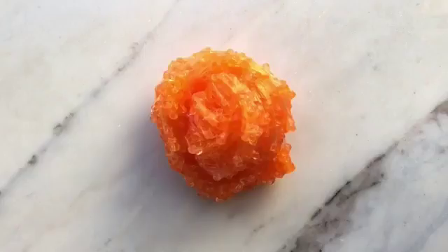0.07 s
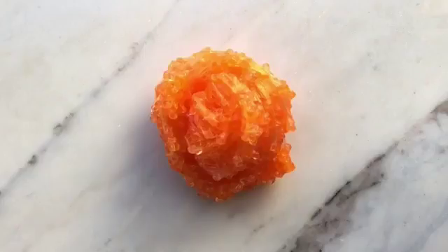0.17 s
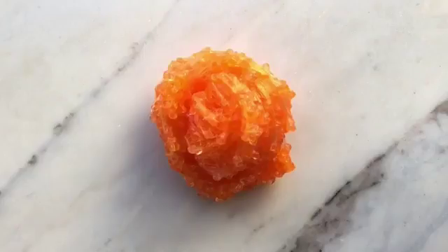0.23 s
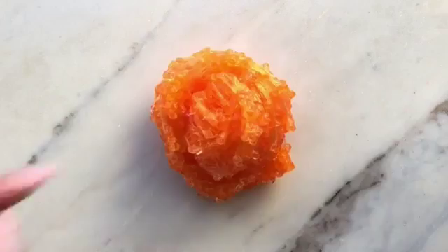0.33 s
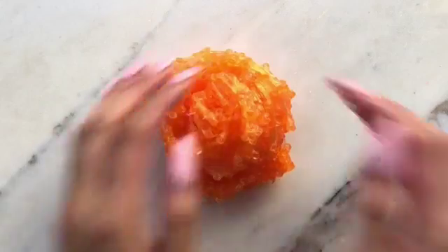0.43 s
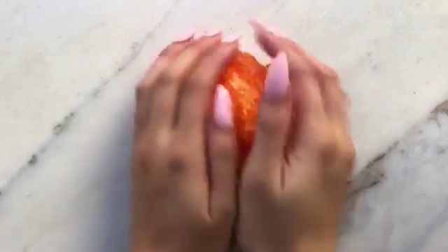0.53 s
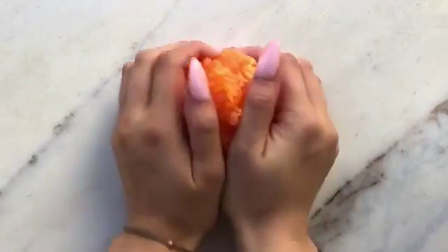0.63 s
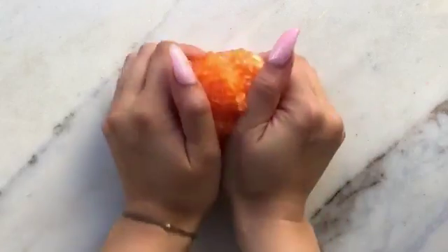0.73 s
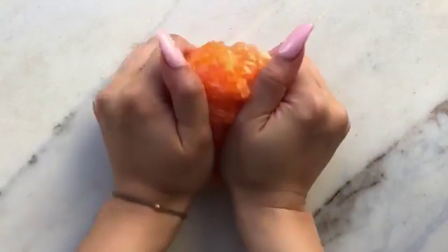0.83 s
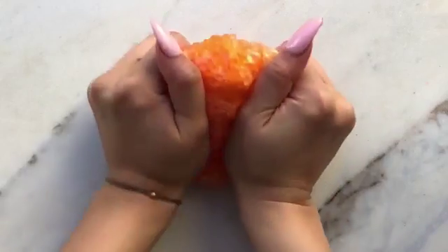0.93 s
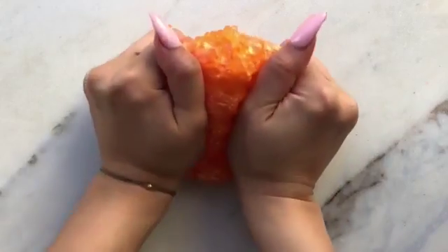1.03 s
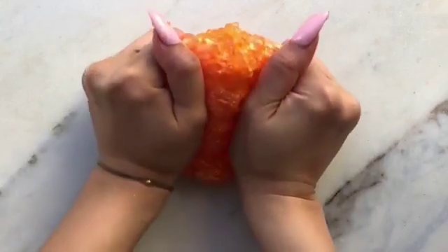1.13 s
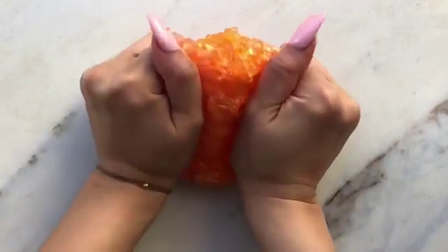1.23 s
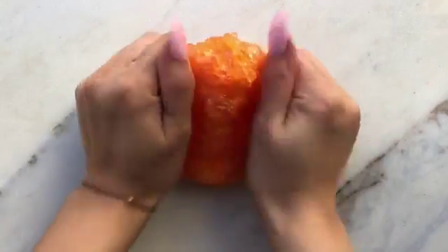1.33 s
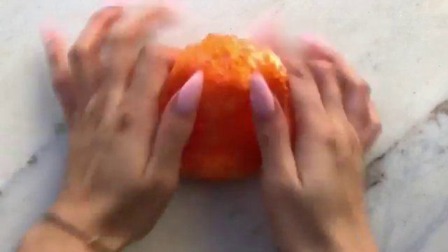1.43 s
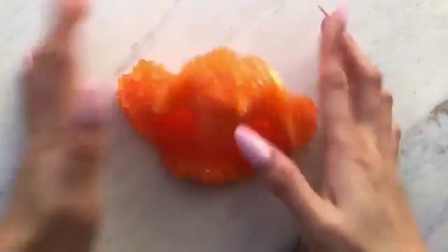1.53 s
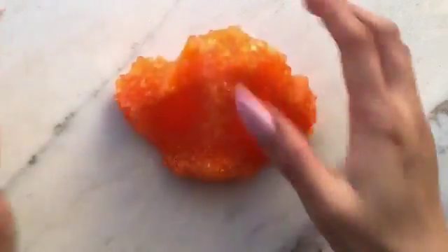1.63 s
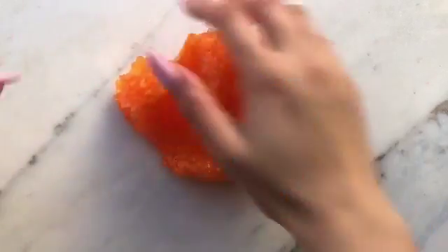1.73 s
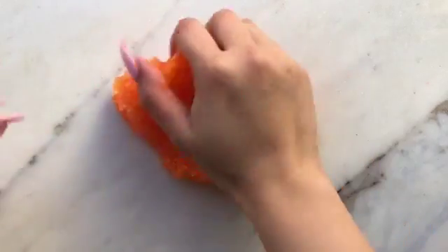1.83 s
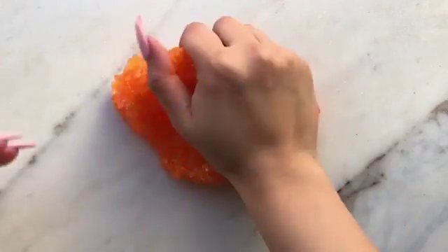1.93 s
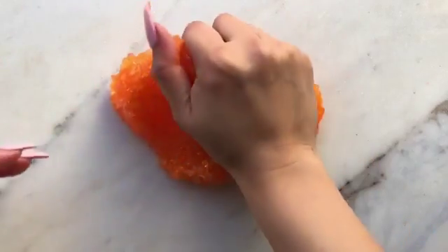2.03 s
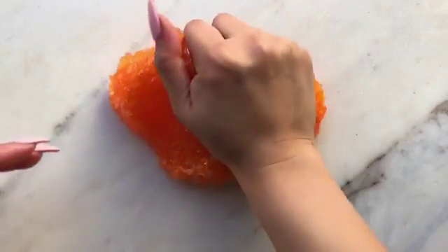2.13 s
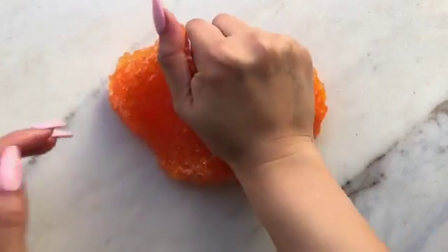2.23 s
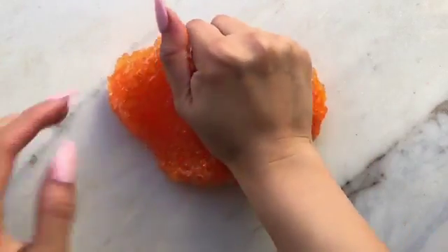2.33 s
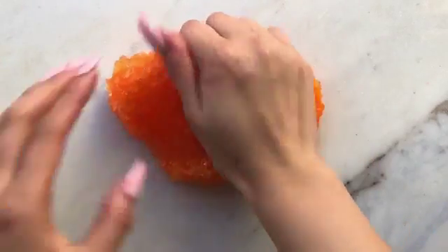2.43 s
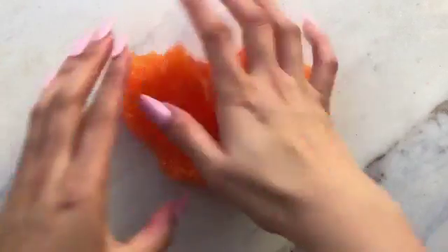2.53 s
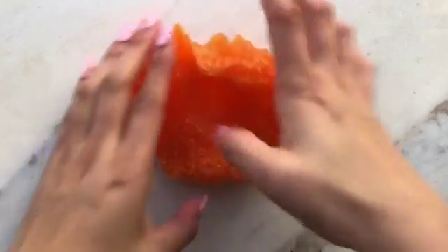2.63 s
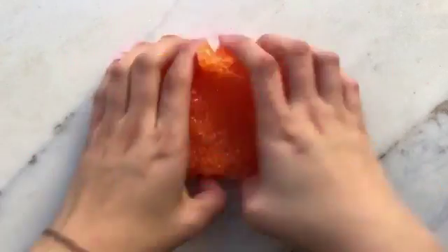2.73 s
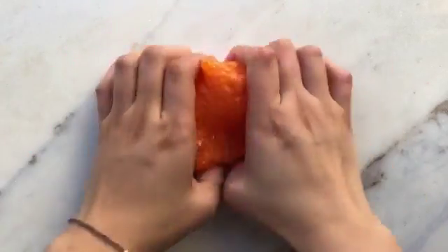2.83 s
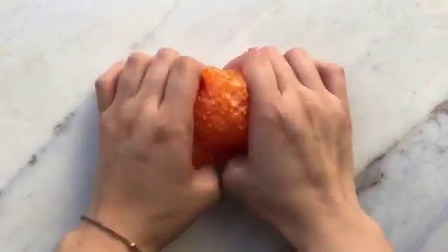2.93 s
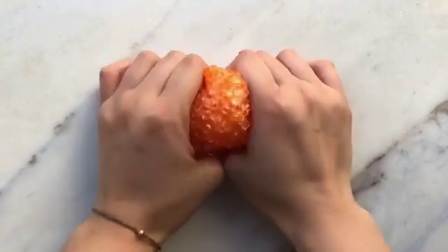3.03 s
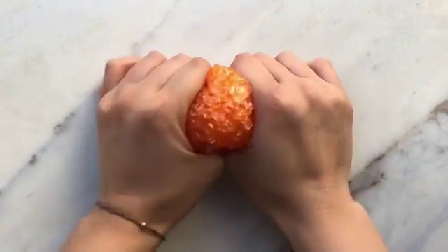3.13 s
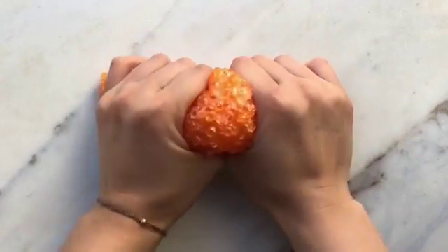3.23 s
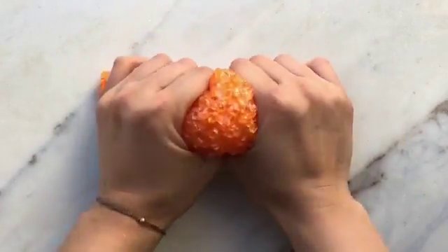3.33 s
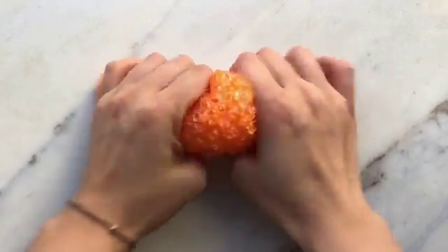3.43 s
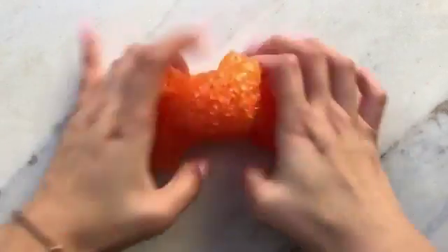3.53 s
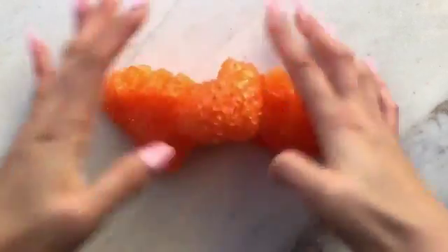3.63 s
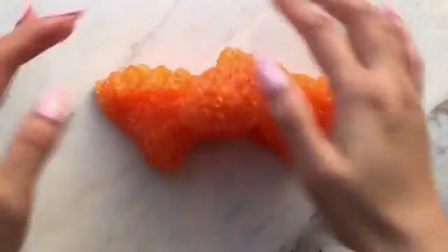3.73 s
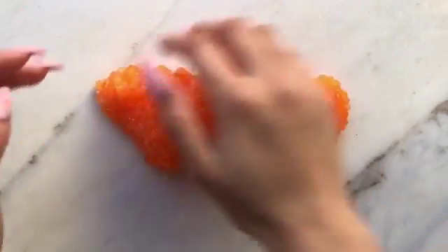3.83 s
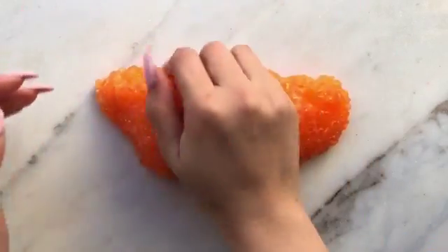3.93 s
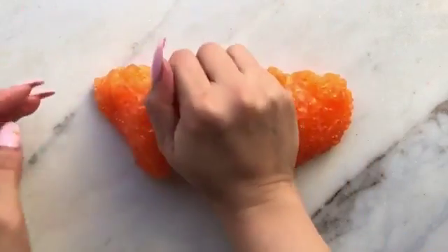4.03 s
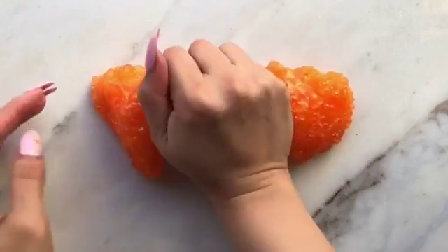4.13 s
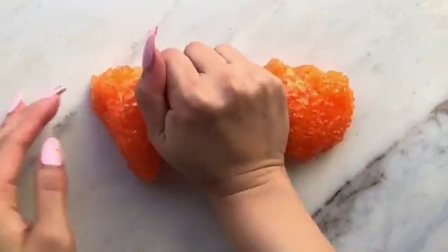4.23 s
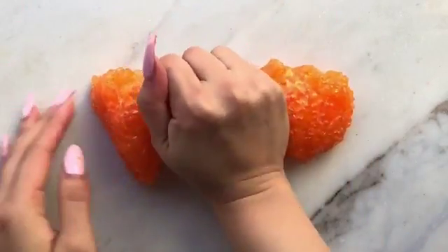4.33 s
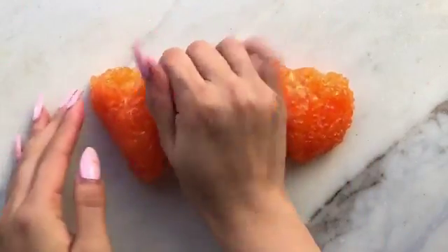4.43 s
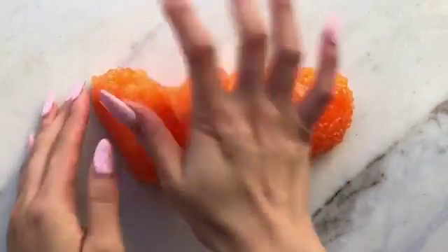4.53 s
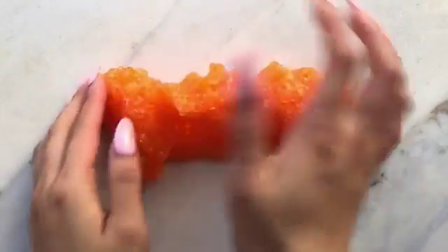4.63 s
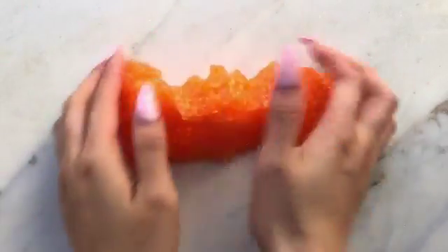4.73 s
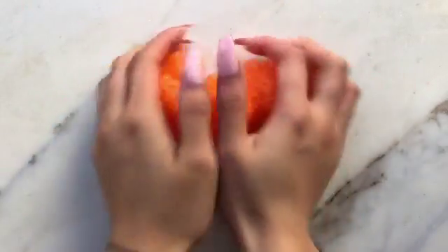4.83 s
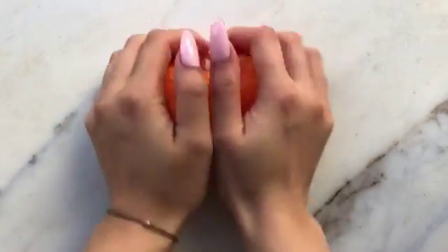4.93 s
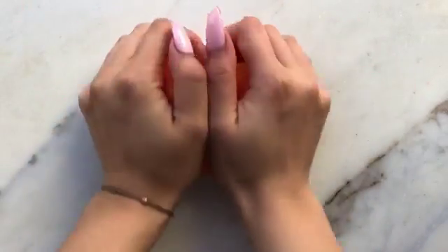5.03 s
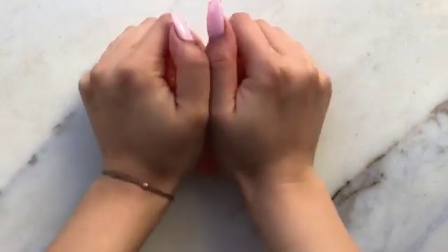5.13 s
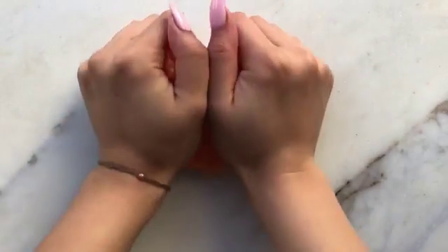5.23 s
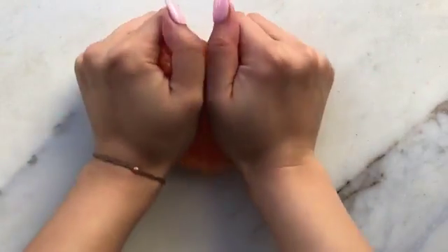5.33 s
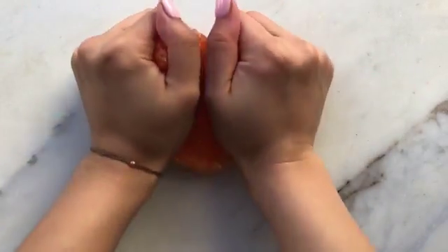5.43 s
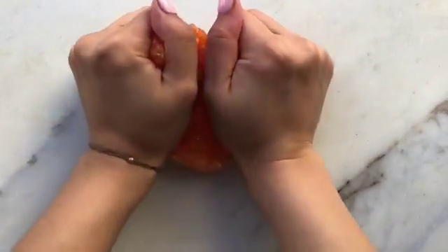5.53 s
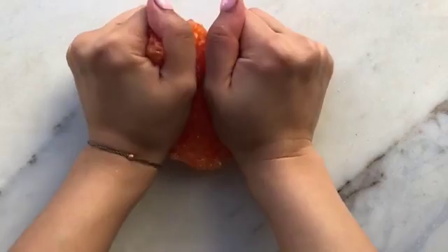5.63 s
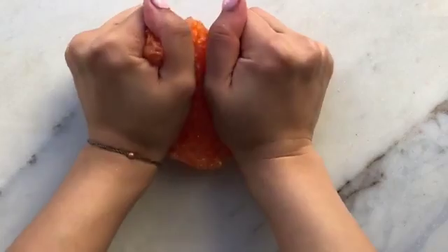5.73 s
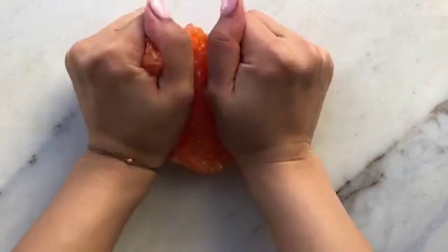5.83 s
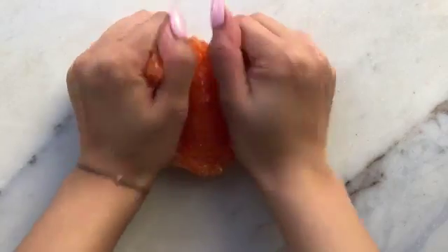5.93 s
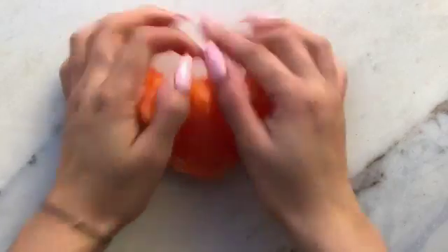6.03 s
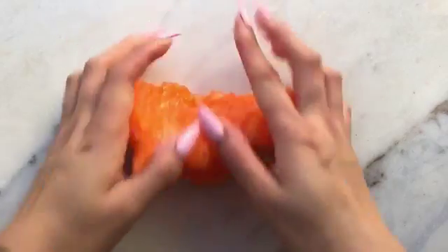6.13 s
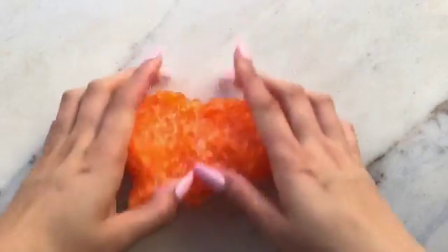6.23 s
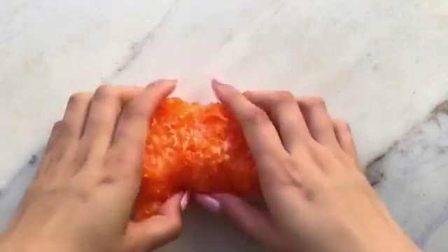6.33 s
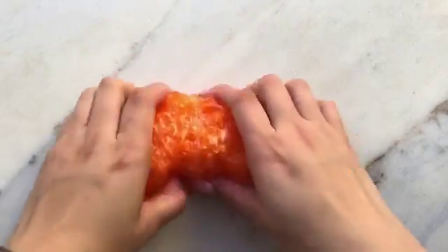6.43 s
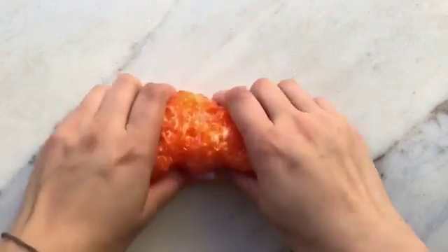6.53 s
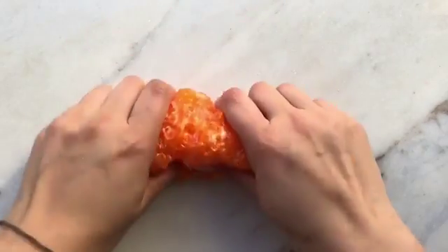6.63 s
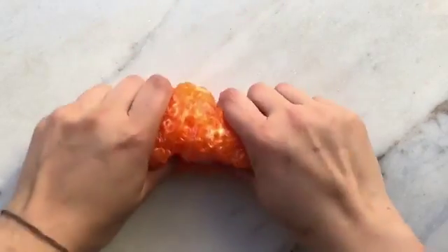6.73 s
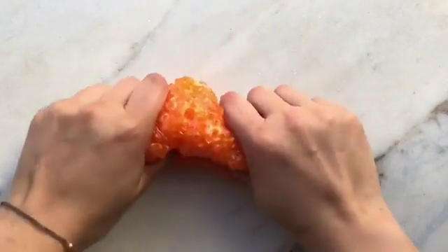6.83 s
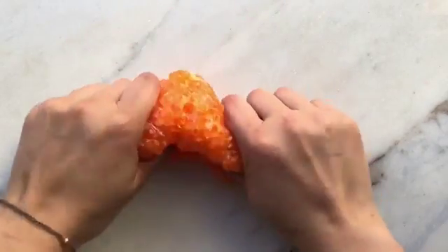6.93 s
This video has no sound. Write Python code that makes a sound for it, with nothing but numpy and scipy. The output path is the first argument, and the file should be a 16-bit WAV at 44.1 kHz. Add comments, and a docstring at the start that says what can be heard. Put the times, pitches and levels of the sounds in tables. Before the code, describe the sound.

Hands work slime full of small beads on a stone table, heard close up with very little echo. It opens with one pop as the slime peels free. From about 0.6 to 1.4 seconds the first squeeze brings sharp pops of bursting air over a dense, bright crackle and a wet squelch. More squeezes follow at about 1.8 to 2.4, 2.8 to 3.4, 4 to 4.5 and 4.8 to 5.9 seconds, and a last one from 6.3 to around 7 seconds. The first two are the strongest. Between the squeezes come sticky peels, with softer crackle and a few scattered pops. At 5.5 seconds a soft, low bump sounds far off in the building, under the fifth squeeze. A quiet room rumble and a faint motor hum run throughout, and the rumble swells briefly near 6.8 seconds.

```python
"""Hands work a slime full of small beads on a stone table, close up, over room rumble and faint motor hum.
It opens on one pop as the slime peels free. From 0.6 s come six squeezes with a sticky peel between each:
air pockets between the beads burst as sharp pops over a dense crackle and a wet squelch, and the table
throws each pop back at once. At 5.5 s, under the fifth squeeze, a distant bump sounds in the building.
The rumble swells under the last squeeze."""
import sys
import numpy as np
from scipy import signal
from scipy.fft import rfft, irfft
from scipy.io import wavfile
from scipy.ndimage import uniform_filter1d

SR = 44100
rng = np.random.default_rng(int(sys.argv[2]) if len(sys.argv) > 2 else 0)


def generate_wav(sig):
    """Save sig (samples, or channels by samples) to the path in sys.argv[1] as 16-bit PCM at SR."""
    pcm = np.round(np.clip(np.atleast_2d(sig).T, -1, 1) * 32767).astype(np.int16)
    wavfile.write(sys.argv[1], SR, pcm)


N = 307366

# tone colour of the room's air: (frequency [Hz], relative level [dB])
ROOM_SPECTRUM = [(20, -65), (45, -8), (60, 2.5), (72, -10.5), (86, 3.5), (96, -8.5), (106, 0.5),
                 (116, -10.5), (128, 2.5), (150, -5.5), (220, -10.5), (350, -20), (500, -19), (800, -27),
                 (2000, -34.5), (8000, -41.5), (14000, -48.5)]
# level ride of the rumble: (time [s], level [dB])
RUMBLE_RIDE = [(0.0, -55.5), (1.5, -52), (2.4, -58.5), (2.6, -54), (4.5, -52), (4.85, -49), (5.2, -53),
               (6.55, -53.5), (6.77, -44), (6.97, -53)]
# motor tones: (frequency [Hz], rms level [dB])
MOTOR_TONES = [(328, -76), (652, -73.5), (1717, -84)]
# low modes of the bump in the building: (frequency [Hz], level [dB], time to fall 60 dB [s])
BUMP_MODES = [(57.4, -39, 0.59), (91.3, -36.5, 0.71), (112, -34.5, 0.63), (137.3, -40, 0.66),
              (170, -42.5, 0.44), (226, -36, 0.233), (297, -41.5, .15)]
# slaps off the table, hands and phone stand: (average delay [ms], highest level [dB])
CLOSE_ECHOES = [(.42, -5), (1.2, -12), (2.3, -14), (3.4, -10)]
# tone colour of the crackle: (frequency [Hz], relative level [dB])
CRACKLE_SPECTRUM = [(900, 12), (1800, 2), (3000, 9), (5500, 8.5), (8000, 7), (11500, 3), (13700, 0.5)]
# hands close on the slime; the five times, once sorted, mark touch, grip, press, ease and still:
# (five times [s], base crackle level at grip [dB], at press [dB], at ease [dB])
SQUEEZE_CUES = [(0.58, 0.71, 0.96, 1.186, 1.395, -32, -30.5, -36.5),
                (1.84, 1.93, 1.89, 2.29, 2.454, -48.5, -33, -40),
                (2.78, 2.84, 3.29, 3.355, 3.375, -41, -34.5, -41.5),
                (3.95, 4.07, 4.21, 4.33, 4.51, -42.5, -38, -46.5),
                (4.76, 4.86, 5.5, 5.86, 5.91, -44.5, -38.5, -47),
                (6.25, 6.4, 6.54, 6.92, 7.1, -46.5, -36, -41)]
# skin peels off the sticky surface: same columns
PEEL_CUES = [(-0.1, 0.0, 0.054, 0.067, 0.087, -48.5, -41.5, -49),
             (1.3, 1.4, 1.597, 1.57, 1.616, -34.5, -39.5, -53),
             (2.38, 2.48, 2.565, 2.655, 2.625, -44, -33.5, -43.5),
             (3.42, 3.53, 3.654, 3.56, 3.825, -38, -34.5, -39),
             (4.42, 4.5, 4.56, 4.621, 4.68, -38.5, -35, -45), (5.93, 6.01, 6.1, 6.256, 6.37, -36, -34, -44)]
# air pockets that burst alone: (time [s], peak level [dB], pitch [Hz], knock gain within the pop [dB])
POP_CUES = [(0.047, -20.5, 9000, -28), (0.5606, -40.5, 3450.0, -22.0), (0.5917, -37, 6550, -23),
            (0.6223, -27, 4130.0, -27), (0.633, -22.0, 7900, -41), (0.6725, -21, 3100.0, -15),
            (0.6852, -18.0, 3060.0, -6), (0.6985, -16.5, 3400, -18), (0.71, -14, 3900, -18),
            (0.721, -13.5, 3270, -16), (0.7787, -22, 3380.0, -15), (0.8054, -15, 3010.0, -23.0),
            (0.8152, -13, 8100, -25.0), (0.8369, -9.5, 8450, -10), (0.8585, -7.5, 5430, -13),
            (0.8745, -14, 4780.0, -31), (0.8996, -7.5, 5030, -16), (0.9115, -2, 5850, -25),
            (0.9338, -8, 7040, -22), (0.9484, -10.5, 5190.0, -25), (0.9629, -1.5, 5960.0, -24),
            (0.9796, -7, 7640.0, -26.0), (0.9868, -4, 9050, -29), (1.0034, -2.5, 8450, -26),
            (1.028, -4, 9900, -44), (1.0383, -6.5, 8750, -39), (1.0434, -15, 8400, -40.0),
            (1.0584, 3, 6650, -21.5), (1.085, -3.5, 11000, -44), (1.1014, -11.0, 13330.0, -32.0),
            (1.1105, -8.5, 10400.0, -39), (1.1238, -0.5, 10030, -28.5), (1.1528, -0.5, 4950, -28),
            (1.1755, -20, 9950.0, -28.0), (1.2098, -5, 12300.0, -28), (1.2236, -9.5, 5710.0, -32),
            (1.2594, -5.5, 9350, -45), (1.3182, -16.5, 8500, -36), (1.3467, -14.5, 9200, -41),
            (1.375, -20, 11100, -34.0), (1.5233, -12.5, 13100, -30), (1.563, -19, 5230, -24.0),
            (1.597, -21, 5600.0, -35.5), (1.858, -21, 7100, -19), (1.8625, -25, 3080.0, -19),
            (1.9001, -13.5, 7620.0, -22.5), (1.9159, -17.5, 4000, -9), (1.9245, -19, 6300, -29.0),
            (1.9343, -14, 6300, -30.0), (1.9476, -11.5, 3900, -14), (2.0006, -5.5, 3860, -18.5),
            (2.0088, -10.5, 8800, -32.0), (2.0364, -6.5, 3100, -11.5), (2.062, -2.5, 3900, -12.5),
            (2.0668, -3, 12500, -24), (2.0747, -1, 7950, -37.0), (2.0856, 4.5, 8300, -29),
            (2.103, -0.5, 7560.0, -34), (2.1212, -8, 10790.0, -37), (2.1394, -2.5, 8450, -29),
            (2.1598, -5, 8300, -28.5), (2.1941, -4, 7730, -34), (2.22, -13.5, 8910.0, -40),
            (2.248, -9, 8050, -38), (2.2862, -2, 7500, -27), (2.3251, -8, 10300, -38),
            (2.3506, -12.5, 7410.0, -46.0), (2.3768, -16, 4100, -14), (2.4258, -32, 11400, -31),
            (2.6789, -30.5, 4170, -26.5), (2.8225, -17, 5810.0, -26), (2.846, -11, 5400, -24),
            (2.895, -27, 1960, -27), (2.9007, -15, 8050, -35), (2.955, -17.0, 8300, -22.0),
            (2.9633, -14.5, 3730.0, -30), (2.9736, -8.5, 6210, -31.0), (2.9895, -8, 8600, -30),
            (2.9951, -13.5, 2940, -21), (3.001, -9.5, 3300, -20), (3.059, -11.5, 3340.0, -11.5),
            (3.0622, -2, 7000, -17.5), (3.0861, -4, 5200, -34), (3.1403, -7, 6400, -37),
            (3.1488, -11, 3980, -30), (3.1572, -5, 8070, -30.0), (3.1697, -10.0, 5570, -16.5),
            (3.2244, -2.5, 11440, -34.0), (3.237, -11, 5860.0, -22), (3.2426, -20, 3500, -25),
            (3.2613, -9, 8270.0, -29), (3.2763, -18, 5340, -22), (3.2959, -13, 5530, -15.5),
            (3.3388, -10, 11820.0, -31), (3.3501, -14, 8660.0, -37), (3.3729, -14.5, 7560.0, -21),
            (3.3817, -18.5, 10800, -37), (3.4066, -18.5, 12600, -36), (3.635, -16, 6350.0, -16),
            (3.65, -14.5, 3250, -11), (3.6768, -13, 9000, -23), (3.7364, -20.5, 8200, -36),
            (3.9875, -20.5, 5490.0, -29.5), (4.0642, -19, 5000.0, -16), (4.073, -15, 5000, -24.0),
            (4.0907, -12.0, 3030, -20), (4.1172, -14, 2480, -20), (4.1531, -13.5, 4750, -22.5),
            (4.177, -19.5, 3420.0, -22), (4.1916, -7, 5680.0, -33.0), (4.2193, -15, 11110.0, -27.0),
            (4.2326, -7, 6700, -26), (4.2538, -17, 9820.0, -29.0), (4.2609, -0.5, 8700, -28),
            (4.2824, -14, 8340, -33), (4.2872, -2.5, 6600, -24.5), (4.3935, -34, 11800.0, -28.0),
            (4.4058, -21.5, 7600, -32), (4.744, -27.5, 6800, -24), (4.7931, -37, 6740.0, -19),
            (4.8209, -19.5, 5800, -26), (4.8551, -15.5, 3140, -24.0), (4.891, -18, 9400, -36),
            (5.0279, -18, 2860, -25), (5.0317, -12, 2920, -37), (5.1023, -17.5, 11670.0, -20),
            (5.1371, -16.5, 6960.0, -38), (5.1545, -23, 2930.0, -35), (5.1783, -22, 2760.0, -24),
            (5.2156, -17, 2820, -27.0), (5.2536, -15.5, 3300, -31), (5.277, -11, 5370, -42),
            (5.2966, -21, 3340.0, -28), (5.3071, -20, 3470.0, -26), (5.3223, -16.5, 3550.0, -17),
            (5.364, -12, 9370.0, -42), (5.3998, -10.5, 5150, -21.5), (5.409, -18, 3250, -26),
            (5.4212, -8, 5260, -13), (5.435, 0.5, 7300, -34), (5.4724, -14, 3210.0, -19),
            (5.4777, -11, 5570, -26), (5.4913, -3, 6840, -27), (5.548, -11.5, 3300, -27),
            (5.5598, -8.5, 13600, -30), (5.608, -16.5, 3630, -13.5), (5.633, -21, 8300, -24),
            (5.6664, -13.5, 8800, -35), (5.6813, -23, 7800, -24), (5.7081, -21, 12250.0, -28),
            (5.7446, -3.5, 8730, -49), (5.7788, -12, 4970, -34), (5.7892, -12.5, 7600, -23),
            (5.813, -8.5, 9970.0, -23), (5.819, -11.5, 4100, -12.5), (5.911, -24.5, 3470.0, -18),
            (5.9263, -19.5, 6300, -19), (6.201, -15.5, 7800, -23), (6.3315, -18, 4610.0, -40),
            (6.4035, -10.5, 4700, -12.5), (6.468, -25, 9130.0, -27), (6.5088, -23, 8570.0, -13),
            (6.531, -14, 4530, -6), (6.5426, -18, 6030, -20), (6.5778, -21, 6670, -24),
            (6.6085, -6.0, 6900, -23), (6.7148, -14.0, 7100, -19), (6.7255, -11.5, 6980, -13.5),
            (6.7456, -13, 7320.0, -19), (6.7643, -15, 4330.0, -21), (6.8032, -16, 11300, -20),
            (6.831, -8, 9440, -16), (6.8406, -19, 2100, -23), (6.873, -15, 7900, -30),
            (6.8864, -22, 4310.0, -13), (6.934, -15.5, 2350, -11), (6.95, -21.5, 2420, -9)]

# ends_db: crackle at touch and still; per stage, wet_db: squelch over crackle, tilt: brightness [dB/octave]
SQUEEZE_FEEL = dict(ends_db=(-66.5, -56.5), wet_db=(-7.5, -15.5, -16.5, -18, -14.5),
                    tilt=(0, 0.74, 1.2, 3.5, 0.4))
PEEL_FEEL = dict(ends_db=(-66.5, -63.5), wet_db=(-16.5, -12, -9.5, -14, -8), tilt=(.8, 0.8, 4.5, 3.5, -2))


def gain_of(db):
    return 10 ** (np.asarray(db) / 20)


def unit_rms(x):
    return x / np.sqrt(np.mean(x ** 2) + 1e-20)


def level_at(spectrum, hz):
    f, db = np.transpose(spectrum)
    return np.interp(np.log(hz + 1), np.log(f + 1), db)


def drift(samples):
    return unit_rms(uniform_filter1d(rng.standard_normal(N), samples))


def add(mix, s, sound):
    part = mix[round(s * SR):][:len(sound)]
    part += sound[:len(part)]


def room_tone(air_db=-54.5):
    """The bed: steady air, with a rumble below 200 Hz that drifts in level."""
    colour = gain_of(level_at(ROOM_SPECTRUM, np.fft.rfftfreq(N, 1 / SR)))
    air = unit_rms(irfft(rfft(rng.standard_normal(N)) * colour, N))
    low = signal.sosfilt(signal.butter(2, 200, fs=SR, output="sos"), air)
    ride_db = np.interp(np.arange(N) / SR, *np.transpose(RUMBLE_RIDE))
    return gain_of(ride_db) * unit_rms(low) + gain_of(air_db) * (air - low)


def motor_hum():
    """Faint motor tones, each wavering in level and phase."""
    t, out = np.arange(N) / SR, np.zeros(N)
    for hz, db in MOTOR_TONES:
        waver = drift(6000)
        out += np.sqrt(2) * gain_of(db + 0.87 * waver) * np.sin(2 * np.pi * hz * t + waver)
    return out


def distant_bump(at_s=5.5, attack_s=0.0086):
    """One soft bump in the building rings out in low modes."""
    t, out = np.arange(SR // 2) / SR, np.zeros(N)
    for hz, db, t60 in BUMP_MODES:
        envelope = gain_of(db - 60 * t / t60) * np.minimum(t / attack_s, 1)
        add(out, at_s, envelope * np.sin(2 * np.pi * (hz * t + rng.random())))
    return out


def wall_reverb(x, t60=0.18, predelay_s=.008):
    """The faint tail that the distant walls return."""
    t = np.arange(SR // 2) / SR
    tail = gain_of(-47.5 - 60 * t / t60) * rng.standard_normal(len(t)) * (t > predelay_s)
    return signal.oaconvolve(x, tail)[:N]


def with_close_echoes(sound, t60=.03):
    """Tight slaps and a short scattered tail; both change with the spot where the sound starts."""
    t = np.arange(1500) / SR
    taps = gain_of(-29 - 60 * t / t60) * rng.standard_normal(len(t)) * (t > .0008)
    taps[0] = 1  # direct sound
    for (ms, db), (far, weak) in zip(CLOSE_ECHOES, rng.random((len(CLOSE_ECHOES), 2))):
        delay_s = ms * (1 + .9 * (far - .5)) / 1000
        add(taps, delay_s, gain_of([db - 5 * weak]))
    return signal.fftconvolve(sound, taps)


def gestures(cues, ends_db, wet_db, tilt, settle_db_per_s=-84.5):
    """Envelopes for one kind of hand move: crackle gain, squelch gain, gain-weighted brightness."""
    t, envelopes = np.arange(N) / SR, np.zeros((3, N))
    for *times, grip_db, press_db, ease_db in cues:
        times = np.sort(times)
        db = np.interp(t, times, (ends_db[0], grip_db, press_db, ease_db, ends_db[1]), left=-200)
        db += settle_db_per_s * np.maximum(t - times[-1], 0)  # the slime ticks on as it slumps
        crackle = gain_of(db)
        squelch = gain_of(db + np.interp(t, times, wet_db))
        envelopes += crackle, squelch, crackle * np.interp(t, times, tilt)
    return envelopes


def hands(uneven_db=3.01, uneven_s=0.039):
    """Uneven finger pressure plus peels: crackle gain, squelch gain, brightness, smooth squeeze gain."""
    pressure = gain_of(uneven_db * drift(round(uneven_s * SR)))
    squeeze = gestures(SQUEEZE_CUES, **SQUEEZE_FEEL)
    crackle, squelch, weighted_tilt = pressure * squeeze + gestures(PEEL_CUES, **PEEL_FEEL)
    return crackle, squelch, weighted_tilt / crackle, squeeze[0]


def burst(hz, cycles, phase=0):
    """A pocket of air swells and dies within a few cycles, pushing no net air; peak 1."""
    turns = np.arange(500) / SR * hz
    envelope = turns ** 2 * np.exp(-2 * turns / cycles)
    ring = envelope * np.sin(2 * np.pi * (turns + phase))
    ring -= envelope * ring.sum() / envelope.sum()
    return ring / abs(ring).max()


def grains(pitches_hz, sizes_db, base_per_s, spread_db, cycles, tilt=0):
    """Random bursts at many pitches and spots, mostly small and a few large, coming in clumps."""
    jostle = rng.standard_normal(N)
    clumps = unit_rms(uniform_filter1d(jostle, size=300) - uniform_filter1d(jostle, size=1800))
    hits = gain_of(spread_db * np.minimum(rng.exponential(1, N), 4)) * rng.choice([-1, 1], N)
    hits *= rng.random(N) < base_per_s / SR * gain_of(2.5 * clumps)
    voice, out = rng.integers(0, len(pitches_hz), N), np.zeros(N)
    for k, (hz, db) in enumerate(zip(pitches_hz, sizes_db)):
        train = hits * (voice == k) * gain_of(db + tilt * np.log2(hz / 4500))
        out += signal.oaconvolve(train, with_close_echoes(burst(hz, cycles)))[:N]
    return unit_rms(out)


def wet_squelch():
    """Larger wet pockets give the slime its low-mid body."""
    hz = np.geomspace(300, 1200, num=14)
    return grains(hz, 4.0 * np.log2(hz / 600), base_per_s=700, spread_db=0.41, cycles=0.68)


def fine_crackle(tilt):
    """Countless tiny pockets burst into a dense, bright texture."""
    hz = np.geomspace(1000, 13500, num=48)
    # higher bursts are shorter and further apart in pitch, so size must rise to hold the colour
    sizes_db = level_at(CRACKLE_SPECTRUM, hz) + 15 * np.log10(hz)
    return grains(hz, sizes_db, base_per_s=5000, spread_db=4.03, cycles=0.74, tilt=tilt)


def pop(hz, knock_db, tear_samples=130):
    """A ring at the pocket's pitch, a broad snap of the film and a dull knock of the beads; peak 1."""
    t = np.arange(-tear_samples, tear_samples + 1) / SR
    snap_tune, knock_tune, phase, tear_length = rng.random(4)
    ring = burst(hz, 0.98 * (hz / 8000) ** 0.32, phase)
    snap = burst(8000 * (0.7 + 0.95 * snap_tune), 0.55) + 0.17 * burst(3270, 0.49)
    knock = burst(1150 * (.8 + .5 * knock_tune), .45)
    # the film tears in small steps before and after the main break
    tear_envelope = np.exp(-abs(t) / (.0003 + .0008 * tear_length))
    tear = .24 * rng.standard_normal(len(t)) * tear_envelope * (rng.random(len(t)) < .2)
    tear[tear_samples] = 1
    sound = np.convolve(0.72 * ring + 0.87 * snap, tear)
    add(sound, tear_samples / SR, gain_of(knock_db) * knock)
    sound = with_close_echoes(sound)
    return sound / abs(sound).max()


def pocket_pops(squeeze_gain, fill_per_s=45, fill_db=13, spread_db=2):
    """Lesser pops fill in at random, riding the squeezes; the featured pops peak on their cues."""
    hits = gain_of(fill_db + spread_db * np.minimum(rng.exponential(1, N), 3))
    hits *= squeeze_gain * (rng.random(N) < fill_per_s / SR)
    pitches_hz = np.geomspace(2800, 12000, num=30)
    voice, out = rng.integers(0, len(pitches_hz), N), np.zeros(N)
    for k, hz in enumerate(pitches_hz):
        out += signal.oaconvolve(hits * (voice == k), pop(hz, knock_db=-26))[:N]
    for s, db, hz, knock_db in POP_CUES:
        sound = pop(hz, knock_db)
        add(out, s - abs(sound).argmax() / SR, gain_of(db) * sound)
    return out


def scene():
    """Mono mix: the slime up front with a touch of reverb, over the room bed."""
    crackle_gain, squelch_gain, tilt, squeeze_gain = hands()
    slime = crackle_gain * fine_crackle(tilt) + squelch_gain * wet_squelch() + pocket_pops(squeeze_gain)
    return (slime + wall_reverb(slime) + room_tone() + motor_hum() + distant_bump())[None]


def record(dry, ceiling=.88, rolloff_hz=14050, edge_hz=15283):
    """A soft clip rounds the loudest peaks; a fast treble roll-off and a steep band limit follow."""
    rounded = dry / (1 + (dry / ceiling) ** 4) ** .25
    rolloff = signal.firwin(201, rolloff_hz, window=("kaiser", 4.5), fs=SR)
    band_limit = signal.firwin(511, edge_hz, window=("kaiser", 9), fs=SR)
    softened = signal.oaconvolve(rounded, rolloff[None], "same")
    return signal.oaconvolve(softened, band_limit[None], "same")


dry = scene()
out = record(dry)
generate_wav(out)
```